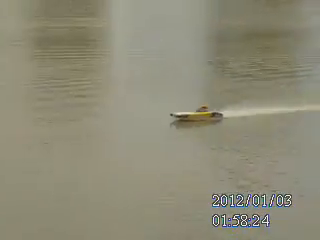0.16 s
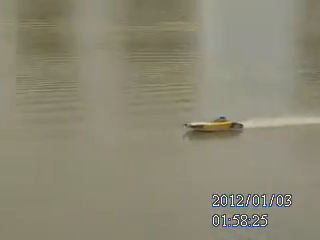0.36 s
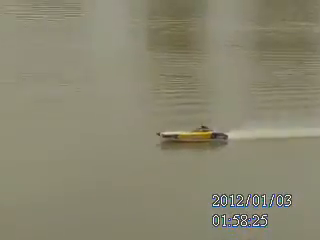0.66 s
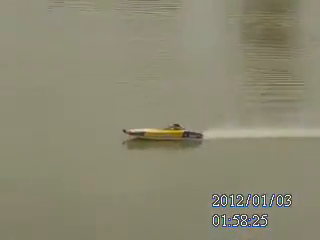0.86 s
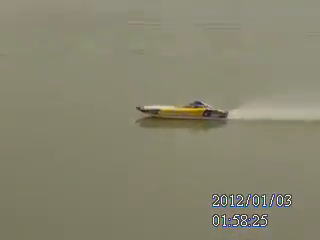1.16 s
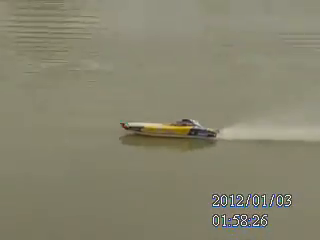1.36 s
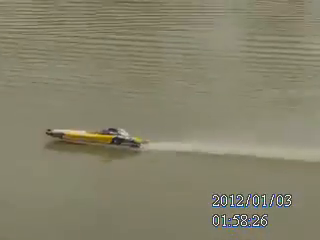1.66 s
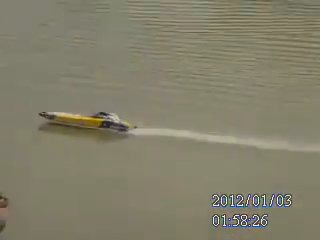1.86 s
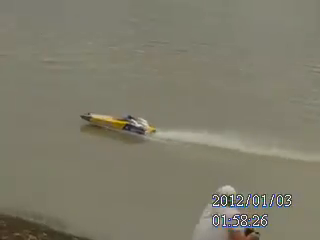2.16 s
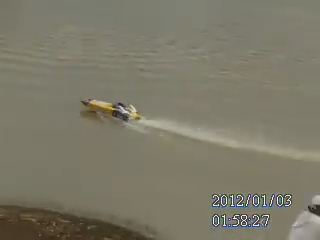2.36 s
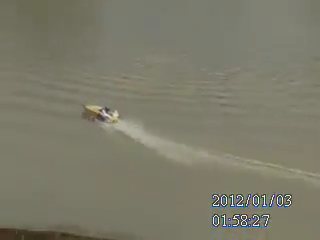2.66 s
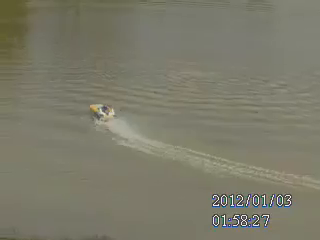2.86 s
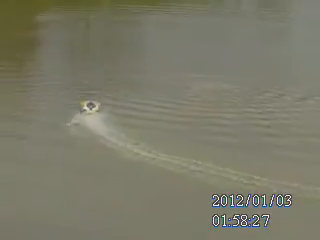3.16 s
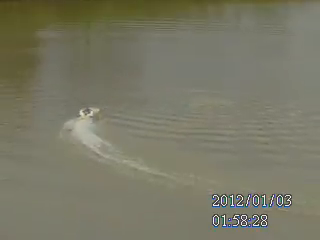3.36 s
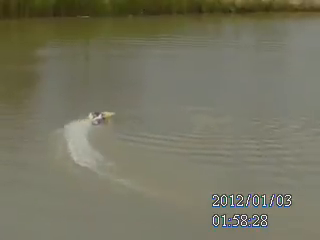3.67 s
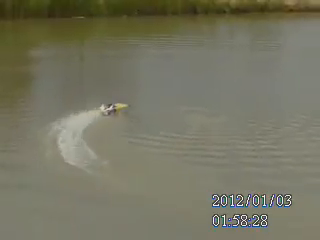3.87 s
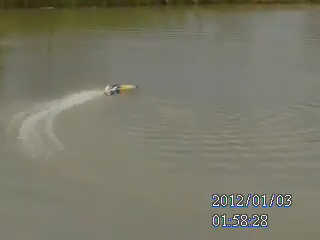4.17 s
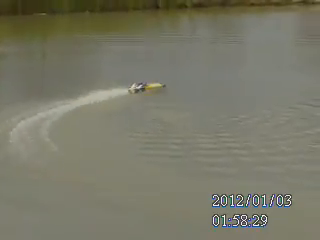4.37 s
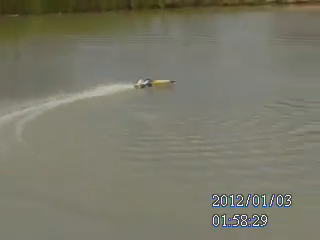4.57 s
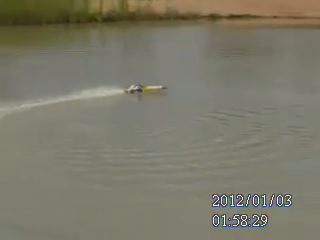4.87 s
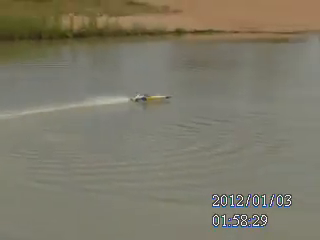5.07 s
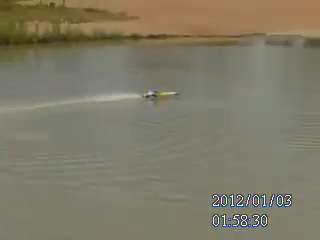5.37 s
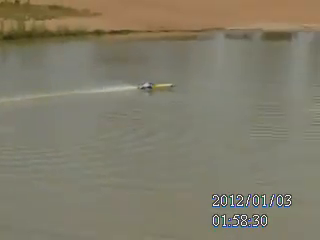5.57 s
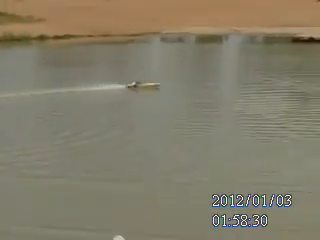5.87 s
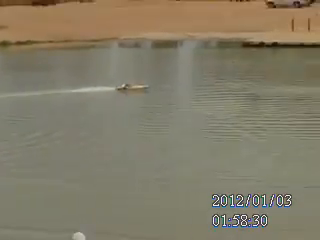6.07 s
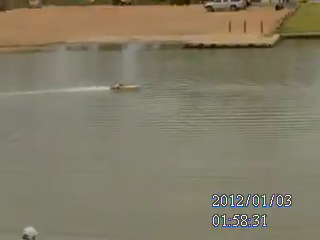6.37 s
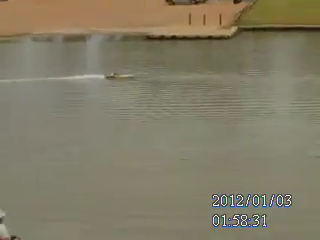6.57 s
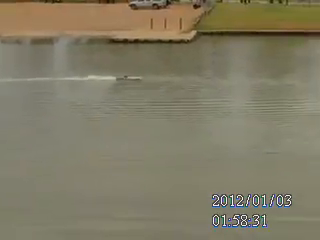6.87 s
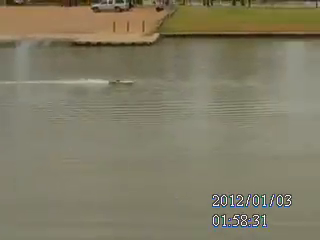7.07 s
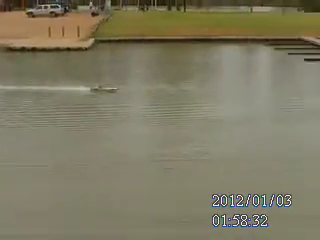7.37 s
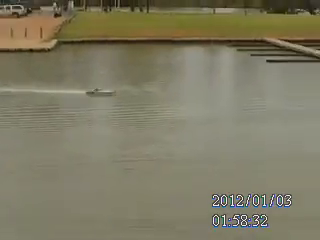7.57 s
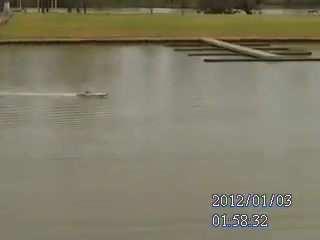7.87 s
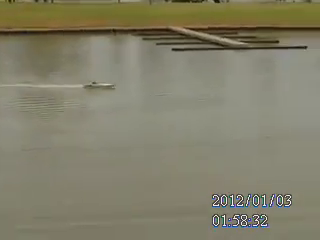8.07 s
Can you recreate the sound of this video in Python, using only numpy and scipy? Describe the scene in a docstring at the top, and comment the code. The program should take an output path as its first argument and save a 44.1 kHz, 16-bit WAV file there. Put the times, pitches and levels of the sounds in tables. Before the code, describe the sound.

A model speedboat's small two-stroke engine buzzes on a pond, heard through a small microphone on the bank over soft breeze and water wash. From the start it climbs in pitch, with a couple of light pops, holding a high, raspy full-throttle whine from about 0.6 seconds. At 1.8 seconds the throttle cuts and the pitch falls to a rough, fast idle. Sharp, irregular backfires crack until 3.2 seconds, the loudest slightly clipped, with a faint echo from the banks and a little more wash. The engine then pulls away in an even buzz, lower than before. From 4.5 seconds it eases down to an uneven sputter, with a few softer pops near 5.7 seconds. At 6 seconds it opens up again and holds a steady buzz until the end, just after 8 seconds. The hull gives one short, hollow slap around 6.8 seconds.

```python
"""A model speedboat on a pond, from a small camera's microphone on the bank, over soft breeze and wash.
Its two-stroke engine runs in at full throttle; every firing rings exhaust pipe and hull, whose colour
turns with the boat. At 1.8 s it coasts into a turn, popping; the banks echo, and the camera limits and
clips the sharpest pops. It pulls away at 3.2 s, eases off from 4.5 s with a few softer pops, opens up
again at 6 s and slaps a ripple as it leaves."""
import sys
import numpy as np
from scipy import signal
from scipy.fft import rfft, irfft, next_fast_len
from scipy.io import wavfile
from scipy.ndimage import uniform_filter1d, minimum_filter1d, map_coordinates

SR = 44100
rng = np.random.default_rng(int(sys.argv[2]) if len(sys.argv) > 2 else 0)


def digitize_waveform(pressure):
    """Quantize a signal to 16-bit integers and store it at the path in sys.argv[1].

    Rows of a 2-D input are taken as channels; values are limited to [-1, 1].
    """
    field = np.atleast_2d(pressure).T
    bounded = np.clip(field, -1, 1)
    quanta = np.round(bounded * 32767).astype(np.int16)
    wavfile.write(sys.argv[1], SR, quanta)


N = 362502

# the loudest backfires, ahead of the limiter: (time [s], crack [dB], pipe ring [dB])
BACKFIRES = [(.16, -5, -15), (.1797, -9, -9), (1.8705, 6.5, -3), (1.894, 1, -30), (1.943, -5, -14),
             (1.969, 3, -22), (2.030, -8, -17), (2.049, -7, -19), (2.087, -0.5, -4), (2.106, -5, -21),
             (2.144, 0.5, -10), (2.1824, 5, -18), (2.259, 6.5, -14), (2.2878, 5.5, -24), (2.307, -8, -33),
             (2.327, 5, -19), (2.3468, 11, -7), (2.43, -7, -7), (2.4505, 11, -2), (2.599, 15, -5),
             (2.6197, 4, -18), (2.642, -2, -15), (2.663, -3, -17), (2.6975, -11, -17), (2.751, 11, 4),
             (2.7736, 8.5, -18), (2.8627, -8, -28), (2.886, -3, -15), (2.921, 14, -3), (2.9435, 1, -8),
             (2.966, 4.5, -16), (3.013, 4, -24), (3.0485, -12, -22), (3.073, 11, -6), (3.136, -2, -13),
             (3.1606, 5, -14), (3.184, -5, -14), (5.6745, -15, -38), (5.751, -6.5, -24), (5.783, -19, -31),
             (5.8045, -13, -30)]
# resonances of pipe and hull, with a level for each heading 0-4: (frequency [Hz], width [Hz],
# approaching [dB], coasting [dB], turning [dB], broadside [dB], leaving [dB])
RESONANCES = [(462, 108, -19.5, -12.5, 0.5, -16, -34), (650.5, 83.4, -11, -5.5, 2, 2.5, 4.5),
              (802, 87, -12.5, -5.5, -8.5, 1.5, -1.5), (1012, 129, -5, 1.5, 10, 3.5, -4),
              (1142, 153, -0.5, 3.5, 12, 5, 1), (1486, 303, -0.5, -2.5, 3.5, -0.5, 2),
              (1733, 215, -1.5, -2, 1, 3.5, 7.5), (1853, 185, -0.5, -5, 0.5, 2.5, 4),
              (2016, 124, -2.5, -7, -1.5, 1, 3.5), (2382, 157, -6, -11.5, -3, -5.5, 3.5),
              (2740, 210, -6.5, -7.5, -2.5, -2, -2), (3130, 427, -6.5, -7.5, -6, -5, -2.5),
              (3550, 128, -4, -3, -1, -1, -1), (3810, 700, -11, -16, -6, -11.5, -10.5),
              (5370, 850, -5, -12.5, -5.5, -13.5, -8), (6800, 1130, -7, -19, -6, -17, -10.5),
              (9110, 920, -4, -16, -2, -14.5, -9), (10670, 2080, -4, -17, -4.5, -17.5, -10.5)]
# the way to the microphone, on which hull and spray mask the tailpipe and blur its shocks:
# (time [s], masking [0-1], glancing copies [dB])
MIC_PATH = [(0, 0.27, -41), (.55, 0.79, -9), (1.78, 0.64, -11), (2.15, 0.06, -3.5), (3.25, 0.1, -9.5),
            (4.4, 0.47, -14.5), (4.8, 0, -1), (5.2, 0.27, -8.5), (6.1, 0.48, -9.5), (6.6, 0.38, -4),
            (8.22, 0.4, -7)]
SCATTER_DB = (4.3, 1)  # spread of the firings' strength: (idling, smooth)
BOBBING_PER_S = 9.9  # how fast the hull skips over ripples


def amp(db):
    """Decibels to gain."""
    return np.exp(np.asarray(db) * np.log(10) / 20)


def unit(x):
    """x at rms 1."""
    return x / np.sqrt(np.mean(x ** 2) + 1e-20)


def smoothed(x, size):
    """x averaged twice over size samples."""
    return uniform_filter1d(uniform_filter1d(x, size=size), size=size)


def steady(x):
    """x with its slow swells evened out to rms 1."""
    return x / np.sqrt(np.abs(smoothed(x ** 2, 1800)) + 1e-14)


def along(points, hz):
    """(frequency [Hz], value) points joined on a log axis."""
    f, v = np.transpose(points)
    return np.interp(np.log(hz + 1), np.log(f + 1), v)


def curves(rows):
    """One value per sample for each column after the time."""
    times, *columns = np.transpose(rows)
    return [np.interp(np.arange(N) / SR, times, column) for column in columns]


def swell(start, end, fade_s):
    """A gain that fades in, holds and fades out."""
    t = np.arange(N) / SR
    return np.clip(np.minimum(t - start, end - t) / fade_s, 0, 1)


def wobble(rate, size=4096):
    """A smooth random curve, rate knots a second."""
    at = np.linspace(0, N, size)
    knots = rng.standard_normal(int(N * rate / SR) + 4)
    return np.interp(np.arange(N), at, map_coordinates(knots, [at * rate / SR]))


def filtered(x, response):
    """x times a complex response of frequency."""
    size = next_fast_len(N + SR // 2)
    return irfft(rfft(x, size) * response(np.fft.rfftfreq(size, 1 / SR)), size)[..., :N]


def band(x, lo_hz, hi_hz, order=3):
    """Causal band-pass."""
    sos = signal.butter(order, [lo_hz, min(hi_hz, .49 * SR)], 'band', fs=SR, output='sos')
    return signal.sosfilt(sos, x)


def delayed(x, seconds):
    """x arriving later by a delay that may move."""
    n = np.arange(N)
    return np.interp(n - SR * seconds, n, x, left=0)


def pulses(at, heights):
    """Windowed-sinc impulses at fractional sample positions."""
    taps = np.floor(at)[:, None].astype(int) + np.arange(-7, 9)
    offset = taps - at[:, None]
    shape = np.sinc(offset) * np.cos(np.pi * offset / 16) ** 2
    return np.bincount(np.clip(taps, 0, N).ravel(), (heights[:, None] * shape).ravel(), N + 1)[:N]


def wash(swell_db=3, width=0.15):
    """Soft churning water and air: louder in the turn, quieter while the boat planes."""
    # water and air at the microphone: (time [s], level [dB])
    levels = [(0, -41), (.6, -50), (1.72, -60), (1.9, -39.5), (3.2, -35.5), (3.6, -41), (4.8, -40.5),
              (5.3, -43.5), (6.5, -44), (8.22, -45)]
    # colour of breeze and wash: (frequency [Hz], relative density [dB])
    spectrum = [(25, -55), (70, -33), (400, -12), (4000, -23), (15000, -52)]
    noise = rng.standard_normal(N) + width * rng.standard_normal((2, N))
    db = curves(levels)[0] + swell_db * wobble(4.5)
    return amp(db) * unit(filtered(noise, lambda hz: amp(along(spectrum, hz))))


def bank_echo(x):
    """Diffuse echo from around the pond, different in each channel."""
    # decay of the echo: (frequency [Hz], t60 [s])
    decay = [(200, 1), (1500, 0.3), (5000, 0.11), (14000, 0.019)]
    hz, t, noise = signal.stft(rng.standard_normal((2, SR // 2)), SR, nperseg=256)
    tail = signal.istft(noise * amp(-60 * t / along(decay, hz)[:, None]), SR, nperseg=256)[1]
    return signal.fftconvolve(x[None], tail / np.linalg.norm(tail[0]), axes=1)[:, :N]


def shore_bounce(x):
    """A wavering copy off the near shore combs the upper range; the comb sinks as its path grows."""
    # lag behind the direct sound as the boat moves: (time [s], delay [s])
    lags = [(0, .00058), (1.8, .0006), (2.6, .00045), (4, .00057), (5, .00087), (6.6, .00117),
            (8.22, .00124)]
    treble = filtered(x, lambda hz: 1 / (1 + (2200 / (hz + 1)) ** 4))
    copy = delayed(treble, curves(lags)[0] + .00002 * wobble(2))
    return x + .3 * amp(3 * wobble(3)) * copy


def glancing(x, count=6, drift_s=.00007, ripple_s=.00005):
    """Copies off hull, water and jetty, whose paths shift with the boat and tremble on the ripples."""
    copies = (delayed(x, lag_s + drift_s * wobble(1.179) + ripple_s * wobble(BOBBING_PER_S))
              for lag_s in np.geomspace(.0018, .016, count))
    return sum(copies) / np.sqrt(count)


def hull_slaps():
    """The hull slaps a ripple: a short hollow double knock."""
    # the two knocks: (time [s], level [dB], pitch [Hz], t60 [s])
    knocks = [(6.804, 1, 2140, .008), (6.8076, -9, 1941, .016)]
    out, t = np.zeros(N), np.arange(SR // 20) / SR
    for start, db, hz, t60 in knocks:
        knock = np.sin(2 * np.pi * hz * t) + rng.standard_normal(len(t))
        out[round(start * SR):][:len(t)] += amp(db - 60 * t / t60) * knock
    return band(out, 1200, 3400, order=2)


def facing(heading):
    """Share 0-1 with which the microphone hears one heading of the boat."""
    # the boat's course: (time [s], heading [0-4, as in RESONANCES])
    course = [(0, 0), (1.78, 0), (2.15, 1), (3.15, 1), (3.5, 2), (3.95, 2), (4.8, 3), (5.85, 3), (6.3, 4),
              (8.22, 4)]
    return np.clip(1 - abs(curves(course)[0] - heading), 0, 1)


def unevenness(idling=1, smooth=0):
    """A quantity that moves with the engine's roughness between its smooth and its idling value."""
    # how roughly the engine runs: (time [s], roughness [0-1])
    roughness = [(0, .28), (.45, .14), (.62, .27), (1.25, .24), (1.75, .28), (1.83, 1), (3.17, 1),
                 (3.27, .28), (4.45, .25), (4.75, .44), (5.1, .56), (5.55, .93), (5.82, .96), (6.2, .27),
                 (7.2, .52), (8.22, .52)]
    return smooth + (idling - smooth) * np.clip(curves(roughness)[0], 0, 1)


def firing_rate(cut_s=1.78, reopen_s=3.19, idle_hz=111.8, run_down_s=.1, sag_hz_per_s=22):
    """Turns a second: driven under power, running down to a fast, sagging idle while the boat coasts."""
    # under power towards the shore: (time [s], firing rate [Hz])
    run_in = [(0.0, 139.4), (0.06, 142), (0.13, 158.4), (0.18, 150.5), (0.22, 163.4), (0.33, 172.1),
              (0.39, 182.3), (0.45, 188.3), (0.5, 184.1), (0.58, 205.9), (0.73, 201), (0.76, 190.7),
              (0.8, 194.9), (0.89, 200.8), (0.92, 192.1), (0.99, 209.3), (1.04, 211.7), (1.11, 206.4),
              (1.27, 214.5), (1.47, 217.7), (1.75, 212.8), (1.78, 192.9)]
    # under power after the turn: (time [s], firing rate [Hz])
    run_out = [(3.2, 95), (3.32, 135.5), (3.36, 147), (3.41, 149.3), (3.55, 143.5), (3.66, 142.5),
               (3.72, 139.3), (4.01, 137), (4.1, 138.6), (4.43, 139.4), (4.58, 131), (4.67, 126.2),
               (4.96, 106), (5.02, 99.5), (5.46, 96.4), (5.57, 93), (5.74, 92.3), (5.9, 95.6), (5.93, 100),
               (6.05, 123.4), (6.16, 137.2), (6.27, 142.6), (6.53, 145.3), (6.6, 144), (6.92, 146.6),
               (7, 144.9), (7.42, 145.2), (7.49, 146.6), (7.57, 145.3), (8.22, 145.9)]
    t = np.arange(N) / SR
    driven, = curves(list(run_in) + list(run_out))
    since = np.maximum(t - cut_s, 0)
    coasting = idle_hz + (run_in[-1][1] - idle_hz) * np.exp(-since / run_down_s) - sag_hz_per_s * since
    return np.where((t > cut_s) & (t < reopen_s), coasting, driven)


def crank(rate, unsteady=0.0017):
    """Turns of the crank so far; every backfire falls on a whole turn."""
    t, pop_s = np.arange(N) / SR, np.transpose(BACKFIRES)[0]
    turns = np.cumsum(rate * (1 + unsteady * wobble(25))) / SR
    slip = np.unwrap(-np.interp(pop_s, t, turns) % 1, period=1)
    return turns + np.interp(t, pop_s, slip)


def pipe_ring(heading, size=2048):
    """The ring of pipe and hull after one impulse, heard from one heading."""
    f = np.fft.rfftfreq(size, 1 / SR)
    modes = (amp(db[heading]) * 1j * f * width / (hz * hz - f * f + 1j * f * width)
             for hz, width, *db in RESONANCES)
    gain = abs(sum((-1) ** k * mode for k, mode in enumerate(modes)))
    # minimum phase: a sharp front, then the ringing
    cepstrum = irfft(np.log(gain + 1e-3))[:size // 2]
    front = np.exp(rfft(np.r_[cepstrum[0], 2 * cepstrum[1:]], size))
    lag_s = .00015 * f / 10000  # the treble trails a little, spreading the front over a few swings
    return -irfft(front * np.exp(-2j * np.pi * f * lag_s))


def backfires(crack_t60=0.0042, grit=0.58, thin_hz=8500, size=2048):
    """Unburnt mixture goes off in single sharp cracks, each ringing the pipe."""
    out, t = np.zeros(N + size), np.arange(size) / SR
    ring = pipe_ring(heading=1)
    body = band(ring, 970, 3600, order=2)
    for start, crack_db, ring_db in BACKFIRES:
        blast = grit * rng.standard_normal(size) * amp(-60 * t / crack_t60)
        blast[0] += 1
        crack = band(signal.fftconvolve(blast, ring)[:size], thin_hz, 22000, order=2)
        pop = amp(crack_db) * crack / abs(crack).max() + amp(ring_db) * body / abs(body).max()
        out[round(start * SR):][:size] += pop
    return out[:N]


def hum(turns, rate, waver=0.57, db_per_octave=17):
    """The pulsing gas flow: clean orders that grow with engine speed and waver with uneven firing."""
    # the lowest orders, with their levels at 200 Hz: (order [x firing rate],
    # approaching [dB], coasting [dB], turning [dB], broadside [dB], leaving [dB])
    orders = [(1, -47.5, -55, -54, -52, -44), (2, -70.5, -49, -56.5, -52.5, -63)]
    out = np.zeros(N)
    for order, *by_heading in orders:
        db = sum(facing(heading) * level for heading, level in enumerate(by_heading))
        # the microphone's low cut weakens the hum as the engine slows
        db += db_per_octave * np.log2(round(order) * rate / 200)
        db += waver * unevenness(*SCATTER_DB) * wobble(30)
        out += np.sqrt(2) * amp(db) * np.sin(2 * np.pi * round(order) * turns)
    return out


def whining(x, turns, fade_s=0.072, flutter_db=4.8, rattle=.38, rattle_per_s=70):
    """Orders that meet a pipe resonance sing, flutter as the hull bounces and rattle on uneven firing."""
    # the singing orders: (start [s], end [s], order [x firing rate], level [dB])
    whines = [(.38, 1.8, 2, -43), (.45, 1.8, 3, -37), (.3, 1.82, 7, -27.3), (-.1, .16, 10, -27),
              (-.1, .16, 13, -28.5), (.15, .52, 11, -29), (.46, 1, 10, -25.5), (.48, 1.8, 8, -32),
              (.5, 1.8, 9, -35.5), (.28, .58, 17, -30.5), (.52, 1.24, 16, -29.5), (1.17, 1.8, 15, -28),
              (.96, 1.27, 25, -35), (1.2, 1.78, 24, -36), (3.25, 3.82, 8, -30.5), (3.75, 4.7, 8, -27.5),
              (3.3, 4.7, 3, -41), (3.3, 3.8, 24, -37), (3.28, 4.95, 12, -36.5), (4, 4.95, 19, -33.5),
              (4.5, 5.02, 17, -31), (4.68, 5.08, 10, -24.5), (4.88, 5.62, 11, -29), (6.05, 7.36, 8, -28),
              (7.48, 8.4, 8, -27.5), (6.1, 8.4, 12, -32), (6.85, 8.4, 11, -32.5), (6.15, 8.4, 17, -35),
              (6.1, 6.8, 19, -33), (6.9, 8.4, 22, -27.5), (6.03, 8.4, 24, -29), (6.05, 6.48, 25, -30),
              (7.1, 7.62, 2, -44), (6.1, 8.4, 3, -44)]
    out = x.copy()
    shake = rattle * unevenness()
    # deeper flutter where the glancing copies are strong
    depth_db = flutter_db * amp(np.minimum(curves(MIC_PATH)[1], -4))
    for start, end, order, db in whines:
        gain = swell(start, end, fade_s)
        on = gain > 0
        spin = np.exp(2j * np.pi * round(order) * turns[on])
        loose = smoothed(2 * x[on] / spin, 900)  # amplitude and phase of this order in x
        bobbing = amp(depth_db * wobble(BOBBING_PER_S))
        flutter = bobbing * (1 + shake * (wobble(rattle_per_s) + 1j * wobble(rattle_per_s)))
        flutter = flutter[on] / np.sqrt(np.mean(abs(flutter[on]) ** 2))
        locked = np.sqrt(2) * amp(db) * flutter * np.exp(1j * np.angle(smoothed(loose, 6000)))
        out[on] += gain[on] * np.real((locked - loose) * spin)
    return out


def dips_and_flares(x, fade_s=0.33):
    """Some bands of the engine's tone dip for a while; resonances flare as the hull beams them ashore."""
    # dipping bands: (start [s], end [s], low edge [Hz], high edge [Hz], depth [0-1])
    dips = [(.3, 2.05, 2100, 2700, .85), (.3, 2.05, 4100, 4750, .6), (4.7, 6.2, 1290, 1450, .85),
            (6.2, 8.6, 2240, 2400, .7), (5.9, 8.6, 550, 615, .45)]
    # flaring resonances: (start [s], end [s], frequency [Hz], width [Hz], gain of the added band [dB])
    flares = [(0.284, 1.15, 5520, 500, 1), (1.65, 2.3, 3320, 500, 0.5), (1.9, 3.05, 1045, 170, 3.5),
              (2.55, 3.298, 1760, 300, 6.5), (3.153, 3.85, 3030, 500, 4), (3, 3.553, 4970, 600, 5),
              (3.9, 5.213, 2110, 680, 8.5), (4.9, 6.4, 2900, 500, -9), (5.28, 6.29, 4900, 1220, 10),
              (5.754, 6.995, 7270, 925, 7), (5.9, 8.6, 3500, 140, 3.5), (7.297, 8.3, 3200, 200, 7)]
    for start, end, lo_hz, hi_hz, depth in dips:
        x = x - depth * swell(start, end, fade_s) * band(x, lo_hz, hi_hz, order=1)
    return x + sum(amp(db) * swell(start, end, fade_s) * band(x, hz - width / 2, hz + width / 2, order=1)
                   for start, end, hz, width, db in flares)


def bouncing(x, *directs):
    """Waves leak out after each bounce: a shock gains a tail, same colour. One output per direct share."""
    # bounces inside pipe and hull: (delay [s])
    bounces = [.00071, .00163, .0029, .0083]
    size = next_fast_len(N + SR // 2)
    lags = np.exp(np.outer(bounces, -2j * np.pi * np.fft.rfftfreq(size, 1 / SR))).astype(np.complex64)
    spectrum = rfft(x, size)
    allpasses = (np.prod((direct - lags) / (1 - direct * lags), axis=0) for direct in directs)
    return [irfft(spectrum * allpass, size)[:N] for allpass in allpasses]


def misfires(turns, at, loss_db=10, rough_above=.87):
    """Loss in dB of each firing: at its roughest the engine misfires every second turn after a pop."""
    popped = np.round(np.interp(np.transpose(BACKFIRES)[0] * SR, np.arange(N), turns))
    turn = np.round(turns[at])
    since_pop = turn - popped[np.searchsorted(popped, turn, side='right') - 1]
    severity = np.clip((unevenness()[at] - rough_above) / (1 - rough_above), 0, 1)
    return loss_db * (since_pop % 2) * severity


def firings(turns, jitter_s_per_db=.00001, gas_db=-5, hiss_db=7):
    """Each turn of the crank fires a shock and a puff of turbulent gas into the pipe."""
    turbulent = unevenness(idling=.44, smooth=.08)
    masked = np.clip(curves(MIC_PATH)[0], 0, 1)
    at = np.interp(np.arange(1, int(turns[-1])), turns, np.arange(N))
    late, strong = rng.standard_normal((len(at), 2)).T
    scatter_db = unevenness(*SCATTER_DB)[at.astype(int)]
    strength_db = scatter_db * np.clip(strong, -2, 1.5) - misfires(turns, at.astype(int))
    shocks = steady(pulses(at + SR * jitter_s_per_db * scatter_db * late, amp(strength_db)))
    puff = steady(signal.lfilter([1], [1, -np.exp(-1 / (.0005 * SR))], shocks))  # 0.5 ms decay
    gas = steady((puff + .35 + .6 * masked) * rng.standard_normal(N))
    # turbulence is strongest in the treble, so the low harmonics stay clean
    hiss = amp(hiss_db - 2.7 * (2.5 - masked)) * band(gas, 6400, 13500, order=2)
    smeared, sharp = bouncing(shocks, .76, .95)
    blurred = masked * smeared + (1 - masked) * sharp
    return np.sqrt(1 - turbulent) * blurred + np.sqrt(turbulent) * (amp(gas_db) * gas + hiss)


def exhaust(turns, trim_db=(-.6, -.6, -.2), bobbing_db=1.54):
    """The firings ring pipe and hull, coloured by heading, and reach the microphone by several paths."""
    # the exhaust's three bands, before trim and bobbing: (time [s], bark [dB], rasp [dB], sizzle [dB])
    levels = [(0, -27, -23.5, -23), (.47, -33, -24.5, -22.5), (.535, -28, -18.5, -21),
              (1.05, -32.5, -22, -21.5), (1.76, -34, -22.5, -21), (1.81, -38, -29.5, -31),
              (1.92, -27.5, -20.5, -25.5), (2.04, -24.5, -19, -28), (2.36, -31, -30, -30),
              (2.56, -21.5, -25, -27), (2.72, -22, -23.5, -24), (2.951, -26.5, -26, -27),
              (3.17, -27.5, -32, -28), (3.24, -31, -30, -21), (4.4, -30, -25, -23),
              (4.87, -24.5, -22, -23.5), (5.4, -24.5, -22.5, -25.5), (5.8, -27, -25.5, -29.5),
              (6.151, -27.5, -21, -23.5), (7.101, -26.5, -21, -24.5), (7.7, -25.5, -18.5, -22.5),
              (8.22, -26, -21.5, -26)]
    flow = shore_bounce(firings(turns))
    flow = flow + amp(curves(MIC_PATH)[1]) * glancing(flow)
    rung = sum(facing(heading) * signal.oaconvolve(flow, pipe_ring(heading))[:N] for heading in range(5))
    tone = dips_and_flares(rung)
    above = lambda hz: filtered(tone, lambda f: 1 / (1 + (hz / (f + 1)) ** 12))
    from_bass, from_middle, sizzle = above(320), above(1400), above(4500)
    bark, rasp = from_bass - from_middle, from_middle - sizzle
    return sum(amp(db + trim + bobbing_db * wobble(BOBBING_PER_S)) * steady(part)
               for db, trim, part in zip(curves(levels), trim_db, (bark, rasp, sizzle)))


def scene(ground_db=-24, echo_db=-18):
    """The boat, its echoes and its wash from the bank, a little stronger on the left."""
    # stereo balance: (frequency [Hz], left over right [dB])
    balance = [(60, 5), (950, 2.5), (5000, 1.67), (14000, 1.85)]
    rate = firing_rate()
    turns = crank(rate)
    engine = whining(exhaust(turns) + hum(turns, rate), turns)
    boat = engine + backfires() + hull_slaps()
    # the bank under the microphone reflects into each channel
    ground = np.array([delayed(boat, lag_s) for lag_s in (.0019, .0034)])
    pair = boat + amp(ground_db) * ground + amp(echo_db) * bank_echo(boat) + wash()
    return filtered(pair, lambda hz: amp(np.outer([.5, -.5], along(balance, hz))))


def limiter(x, ceiling_db=0.5, release_s=0.042, size=31):
    """A peak over the ceiling ducks everything at once; the gain then creeps back."""
    over_db = np.maximum(20 * np.log10(abs(x).max(axis=0) + 1e-9) - ceiling_db, 1e-9)
    age = np.arange(N) / SR / release_s
    duck_db = np.exp(np.maximum.accumulate(np.log(over_db) + age) - age)
    return x * uniform_filter1d(minimum_filter1d(amp(-duck_db), size=size), size=size)


def record(dry, notch_hz=7900, notch_width_hz=200, top_hz=15400):
    """The microphone has a narrow notch; a limiter ducks peaks, the rest clips, and the top is cut."""
    notch = lambda f: (notch_hz ** 2 - f * f) / (notch_hz ** 2 - f * f + 1j * f * notch_width_hz)
    limited = limiter(filtered(dry, notch))
    clipped = limited / (1 + abs(limited / .95) ** 12) ** (1 / 12)
    return filtered(clipped, lambda hz: 1 / (1 + (hz / top_hz) ** 400))


dry = scene()
out = record(dry)
digitize_waveform(out)
```